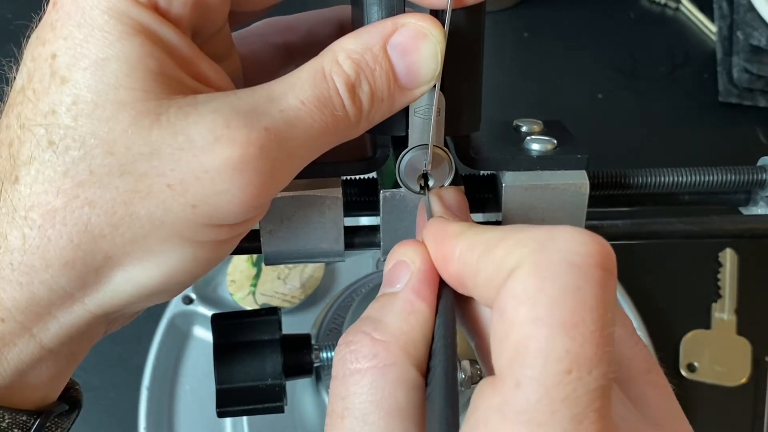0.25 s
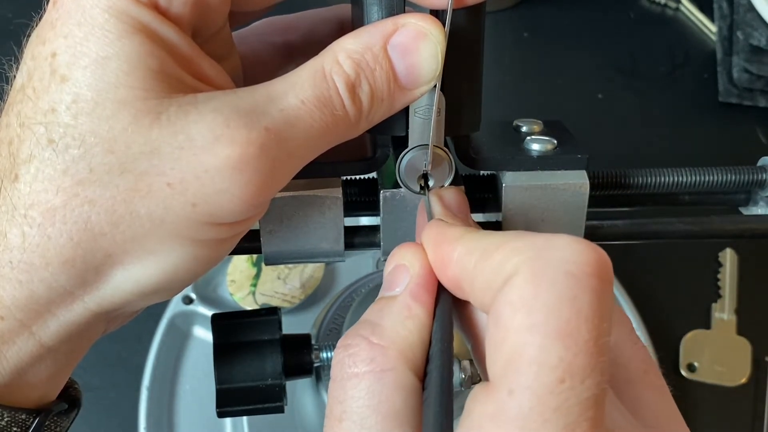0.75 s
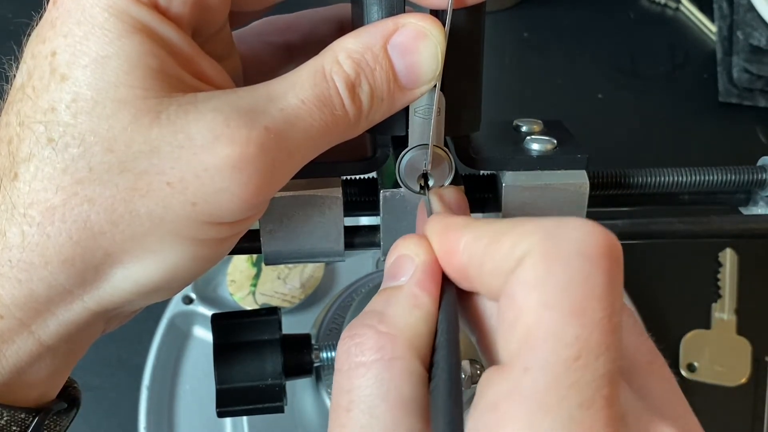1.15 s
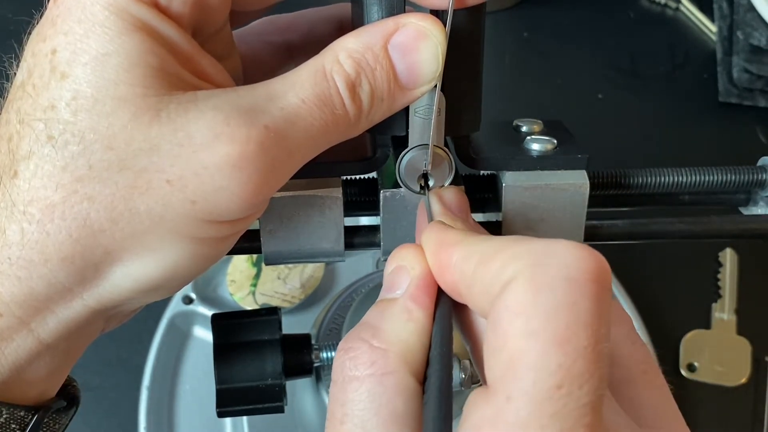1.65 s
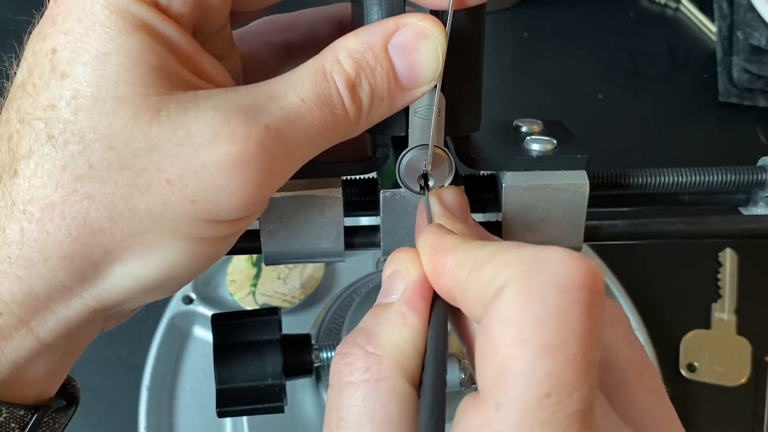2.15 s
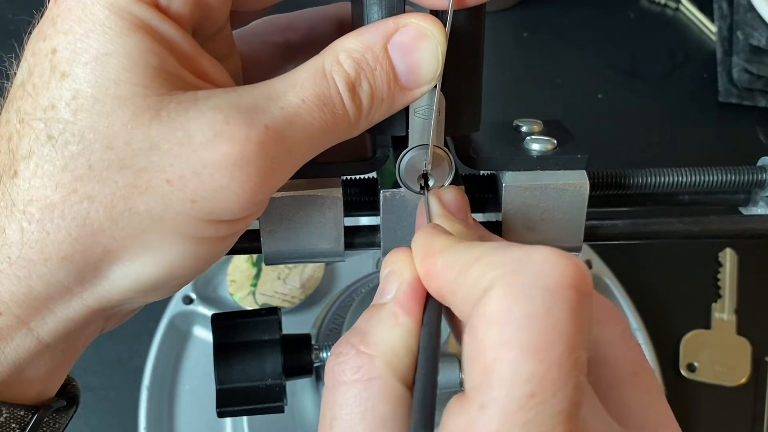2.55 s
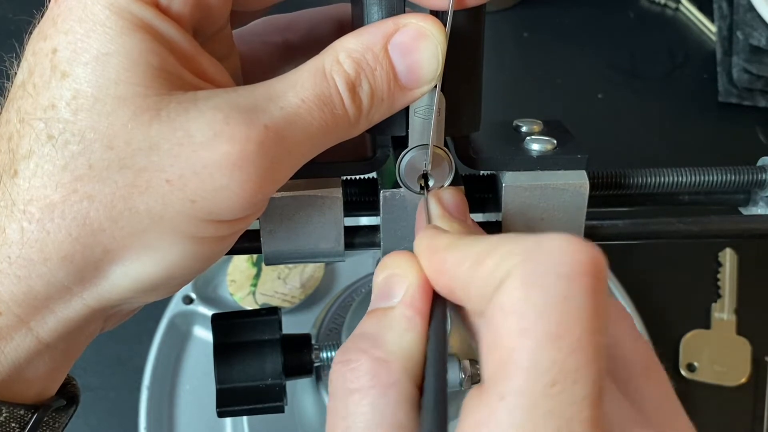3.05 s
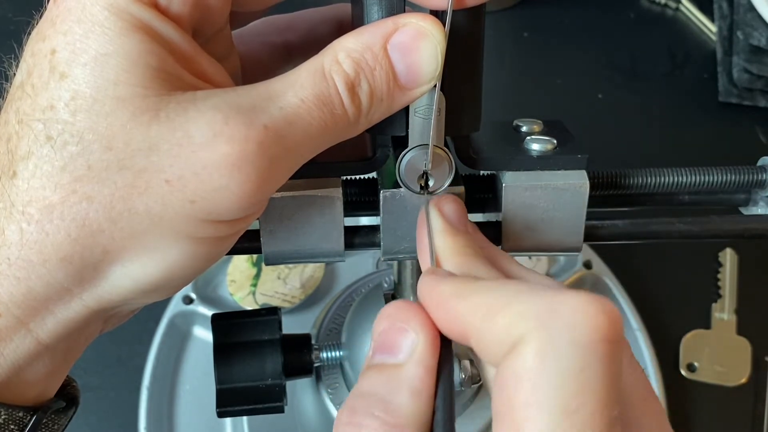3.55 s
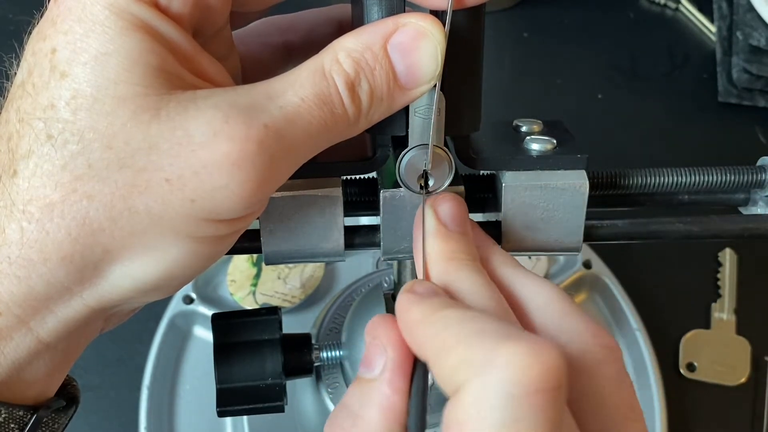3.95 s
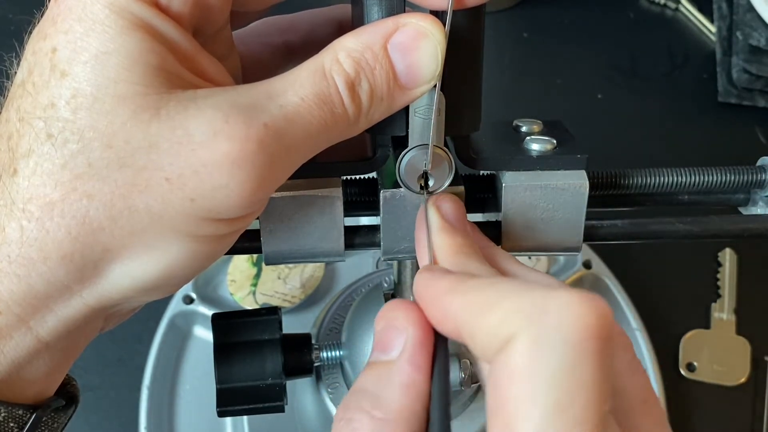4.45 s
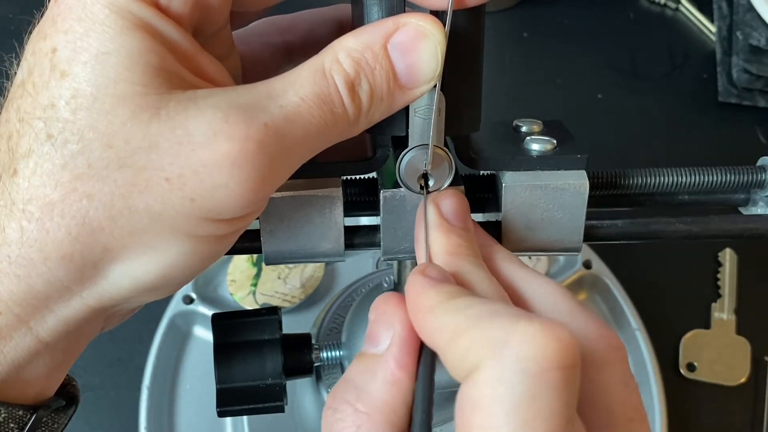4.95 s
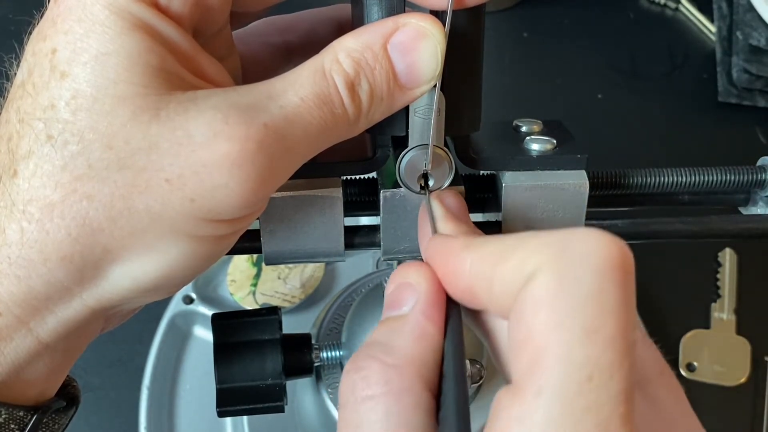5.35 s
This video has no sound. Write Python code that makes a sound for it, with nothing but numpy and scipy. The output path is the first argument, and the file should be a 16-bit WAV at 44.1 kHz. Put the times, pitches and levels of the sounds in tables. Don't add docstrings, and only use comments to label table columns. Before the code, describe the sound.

Close stereo pickup at a desk in a quiet room. A small motor nearby ticks very fast into a hollow casing, a purring rattle with an uneven knock about ten times a second. Over it a pick touches lock pins with faint clicks. Just before three seconds one pin snaps loudly in the metal vice, then small clicks and soft hand bumps continue.

```python
import sys
import numpy as np
from scipy import signal
from scipy.fft import rfft, irfft, next_fast_len
from scipy.io import wavfile

SR = 44100
rng = np.random.default_rng(int(sys.argv[2]) if len(sys.argv) > 2 else 0)


def transcribe(u):
    v = np.clip(np.atleast_2d(u).T, -1, 1)
    q = np.round(v * 32767).astype(np.int16)
    wavfile.write(sys.argv[1], SR, q)


def voltage_ratio(level):
    return 10 ** (np.asarray(level, float) / 20)


N = 246519


def coloured(x, spectrum):
    size = next_fast_len(x.shape[-1])
    hz, db = np.transpose(spectrum)
    bin_hz = np.arange(size // 2 + 1) * SR / size
    gain = voltage_ratio(np.interp(np.log(bin_hz + 1), np.log(hz), db))
    return irfft(rfft(x, size) * gain, size)[..., :x.shape[-1]]


def rms_one(x):
    return x / np.sqrt(np.mean(x ** 2))


def band(x, low_hz, high_hz):
    return signal.sosfilt(signal.butter(2, [low_hz, high_hz], "band", fs=SR, output="sos"), x)


def low_pass(x, cutoff_hz):
    return signal.lfilter(*signal.butter(2, cutoff_hz, fs=SR), x)


def impulses(t_s, db):
    out = np.full(N, 1e-18)
    index = np.clip((np.asarray(t_s) * SR).astype(int), 0, N - 1)
    np.add.at(out, index, voltage_ratio(db))
    return out


def struck(t_s, db, modes, spread_db):
    out = np.zeros(N)
    luck = rng.standard_normal((len(t_s), len(modes)))
    for k, (hz, level_db, t60_s) in enumerate(modes):
        radius = voltage_ratio(-60 / (t60_s * SR))
        angle = 2 * np.pi * hz / SR
        clicks = impulses(t_s, db + level_db + spread_db * luck[:, k])
        poles = [1, -2 * radius * np.cos(angle), radius ** 2]
        out += (-1) ** k * signal.lfilter([0, np.sin(angle)], poles, clicks)
    return out


def bursts(t_s, db, spectrum, t60_s):
    envelope = signal.lfilter([1], [1, -voltage_ratio(-60 / (t60_s * SR))], impulses(t_s, db))
    return envelope * rms_one(coloured(rng.standard_normal(N), spectrum))


def swell(middle_s, length_s):
    phase = np.clip((np.arange(N) / SR - middle_s) / length_s, -.5, .5)
    return np.cos(np.pi * phase) ** 2


# [f/Hz, level/dB per Hz]
AIR = [(25, -19), (60, -3.5), (150, -1.5), (200, -8.5), (450, -11.5), (900, -8.5), (1400, -7),
       (2000, -20.5), (2900, -20.5), (3800, -33), (7000, -34), (9000, -26.5), (14000, -31.5), (16000, -40)]
# [f/Hz, level/dB]
AIR_DIPS = [(500, 0), (630, -3), (800, 0), (1550, 0), (1720, -4), (1900, 0), (2200, 0), (2380, -3),
            (2600, 0)]
# [f/Hz, level/dB per Hz]
AIR_APART = [(25, -37), (100, -18.5), (400, -15), (1000, -7.5), (1400, -9), (1700, -22.5), (2900, -30.5),
             (3500, -46), (16000, -50)]
# [middle t/s, length/s, level/dB]
SWELLS = [
    (.5, .9, -68),
    (1.5, 1.3, -70),
    (3.0, 1.0, -70),
    (3.97, .5, -62),
    (5.3, 1.2, -73),
]
# [f/Hz, level/dB per Hz]
RUB = [(1500, -12), (2800, -6), (3600, 0), (5500, -1), (7000, -12)]


def room_tone():
    white = rng.standard_normal((4, N))
    rumble_level = voltage_ratio(-77) + sum(voltage_ratio(db) * swell(t_s, length_s) for t_s, length_s, db in SWELLS)
    rumble = rumble_level * voltage_ratio(-6) * rms_one(band(coloured(white[2], AIR), 70, 550))
    rub = voltage_ratio(-83) * swell(3.97, .55) ** .4 * rms_one(coloured(white[3], RUB))
    air = voltage_ratio(-67.5) * rms_one(coloured(coloured(white[0], AIR), AIR_DIPS))
    apart = voltage_ratio(-73.5) * rms_one(coloured(white[1], AIR_APART))
    return air + rumble + rub + apart * [[1], [-1]]


def drive_clock():
    first_s, tick_s, gain_s_per_tick2 = -.0018, .0188424, 7.46e-8
    wobble_s, wobble_ticks, wobble_start_rad = .00534, 96.97, 2.323
    tick = np.arange(int(N / SR / tick_s) + 1)
    wobble = wobble_s * np.sin(2 * np.pi * tick / wobble_ticks + wobble_start_rad)
    return tick, first_s + tick_s * tick - gain_s_per_tick2 * tick ** 2 + wobble


# [crest level/dB, late/s]
TEETH = [
    (-48, 0),
    (-58, -.0004),
    (-61, .0003),
    (-61.5, .0003),
    (-59, .0014),
]
# [t/s, crest level/dB]
GLANCING = [(.223, -54.5), (.317, -49.5), (.502, -49.5), (.593, -54.5), (.878, -57), (.974, -51),
            (1.070, -56.5), (1.262, -51), (1.358, -53.5), (1.546, -54), (1.829, -52.5), (2.014, -51),
            (2.478, -55), (2.573, -50), (2.953, -53.5), (3.146, -55.5), (3.241, -50.5), (3.335, -51.5),
            (3.876, -51), (3.969, -54), (4.247, -50.5), (4.530, -51), (4.817, -53.5), (5.104, -51.5),
            (5.478, -53.5), (5.571, -51)]
# [t/s, crest level/dB]
CATCHES = [(.093, -54.5), (.300, -51.5), (.672, -54.5), (1.341, -52.5), (1.905, -51), (1.997, -52.5),
           (2.090, -51), (3.803, -46), (3.894, -54), (3.951, -53), (3.990, -52.5), (4.062, -45.5),
           (4.230, -51.5), (4.455, -52.5), (4.608, -53), (4.741, -54), (4.895, -51), (5.028, -53),
           (5.145, -54), (5.181, -52), (5.404, -53.5), (5.440, -56)]
# [f/Hz, level/dB, t60/s]
CASING = [(740, -17.5, 0.12), (902, -8, 0.1), (1116.7, -0.5, .07), (1201.2, -1.5, 0.087),
          (1303.8, -1.5, .09), (1398.4, -5, 0.074), (1530, -18, 0.067)]
# [f/Hz, level/dB, t60/s]
CASING_HIGH = [(1928, -25, 0.3), (2133, -24.5, 0.18), (2640, -31, 0.15), (2830, -27.5, 0.12)]
# [f/Hz, level/dB, t60/s]
CASING_APART = [(898, -9, .07), (1230, -7, 0.0691), (1330, 0, .09)]
# [f/Hz, level/dB per Hz]
RATTLE = [(2000, -13.5), (3500, -13.5), (6500, -14.5), (8500, -2), (9500, 0), (12000, -8), (13500, -1),
          (15500, -8)]


def motor():
    heavy_tick, slip_tick = 2, 204
    tick, crest_s = drive_clock()
    tooth = (tick - heavy_tick + (tick >= slip_tick)) % len(TEETH)
    heavy = tooth == 0
    tooth_db, late_s = np.transpose(TEETH)[:, tooth]
    luck = rng.standard_normal((len(tick), 3))
    crest_s += late_s + np.where(heavy, .0002, .0008) * luck[:, 0]
    db = tooth_db + np.where(heavy, .7, 2.2) * luck[:, 1]
    for t_s, odd_db in [*GLANCING, *CATCHES]:
        db[np.argmin(abs(crest_s - t_s))] = odd_db
    start_s = crest_s - .0047
    ring = struck(start_s, db - 6.5, CASING, 1.1)
    ring += struck(start_s, .31 * db - 41.5, CASING_HIGH, 2.5)
    edge_db = -71.5 + .35 * (db + 60) + 3 * np.minimum(luck[:, 2], 1.7)
    edge = bursts(start_s + .0006, edge_db, RATTLE, .03)
    side = struck(start_s + .0026, db - 16.5, CASING_APART, 2)
    return ring + edge, side


# [f/Hz, level/dB, t60/s]
TRAY = [(272, -7.5, .08), (540, 0, .05), (318, -10, 0.09), (720, -14, 0.054), (473, 2, .065),
        (410, -9, .06)]
# [f/Hz, level/dB, t60/s]
DESK = [(148, 0, .13), (103, -4, .12), (52, -16, .3)]


def thumps(t_s, tray_db, desk_db, spread_db):
    low = struck(t_s, tray_db, TRAY, spread_db) + struck(t_s + .005, desk_db, DESK, spread_db)
    return band(low, 45, 1000)


# [f/Hz, level/dB per Hz]
CRACK = [(3000, -18.5), (5000, -13), (7000, -3), (9000, 0), (11000, 0), (13000, 1), (15000, -4),
         (16000, -5), (17000, -22)]
# [f/Hz, level/dB per Hz]
SCRATCH = [(600, -8), (1200, 3), (2000, 6), (3500, 6.5), (5000, -2), (6500, -2.5), (9000, -11)]


def contact_noise(t_s, scratch_db, crack_db):
    return bursts(t_s, crack_db, CRACK, .014) + bursts(t_s, scratch_db, SCRATCH, .05)


# [t/s, vice ring level/dB, scratch level/dB, crack level/dB]
PINS = [(0.2605, -67.5, -83, -71), (0.4974, -74, -88, -67), (0.9513, -64, -83, -71),
        (1.1555, -53, -92, -70), (1.3002, -67, -81, -66), (1.8664, -68, -85, -67),
        (2.4213, -39, -41, -46.5), (2.9823, -62, -75, -57.5), (3.0458, -64.5, -84, -68),
        (3.1384, -65, -78.5, -58), (3.1434, -70, -86, -64), (3.1616, -59, -75, -61),
        (3.1795, -58.5, -79, -65), (3.5334, -60, -81, -64), (4.1892, -61.5, -66, -64),
        (4.5046, -62, -61.5, -58), (4.5235, -50, -58, -49), (4.5365, -55, -70, -66),
        (4.5465, -52, -70, -62), (4.6113, -60.5, -85, -77), (4.826, -64, -81, -64), (4.8472, -67, -72, -66),
        (4.8567, -65, -74, -61), (4.8773, -48, -77, -72), (5.137, -60, -74, -66), (5.1407, -62, -71, -64),
        (5.269, -64, -74, -62), (5.388, -43, -76, -49.5), (5.398, -49, -74, -53)]
# [f/Hz, level/dB, t60/s]
PICK = [(1795, -4, .075), (1918, 0, .09), (2160, -11, .05), (2258, -12, .05), (2480, -12, .04),
        (3003, -12, .06), (3220, -14, .05), (585, -9, .05)]
# [f/Hz, level/dB, t60/s]
BLADE = [(3490, 0, .07), (4742, -2, .1), (5400, -11, .08), (6000, -10, .06)]
# [f/Hz, level/dB per Hz]
GRAIN = [(1350, -25), (1750, 0), (2500, -2), (3300, -8), (4000, -28)]


def pick_contacts():
    t_s, ring_db, scratch_db, crack_db = np.transpose(PINS)
    vice = low_pass(struck(t_s, ring_db - 4.5, PICK, 2.2), 2600)
    blade = struck(t_s, scratch_db - 11, BLADE, 1.5)
    grain = bursts(t_s + .001, ring_db - 9, GRAIN, .08)
    push_db = .4 * (ring_db + 60)
    base = thumps(t_s, -77 + push_db, -78 + push_db, 2.2)
    return vice + blade + grain + base, contact_noise(t_s, scratch_db - 4.5, crack_db + 2.5)


# [t/s, tray knock level/dB, desk
# thud level/dB]
BUMPS = [(0.498, -61, -72), (0.69, -64, -64), (1.159, -68, -70), (1.638, -60, -65), (2.058, -53.5, -68),
         (2.423, -62, -72), (2.983, -68, -76), (3.18, -68, -76), (4.506, -75, -62), (2.799, -50, -56),
         (4.527, -53, -52), (4.538, -55, -54), (4.554, -60, -57), (5.396, -58, -51), (5.409, -62, -58),
         (5.429, -68, -67)]


def soft_knocks():
    t_s, tray_db, desk_db = np.transpose(BUMPS)
    return low_pass(thumps(t_s, tray_db + 2.5, desk_db - 1.5, 2.5), 350)


# [t/s, vice ring level/dB, tray knock level/dB, desk thud level/dB]
SNAP = (2.7236, -15, -21.5, -28.5)
# [t/s, scratch level/dB, crack level/dB]
SNAP_CRACKS = [
    (2.707, -62, -75),
    (2.7228, -35, -15),
    (2.7245, -34, -19),
    (2.7288, -38, -30),
    (2.733, -42, -38),
]
# [f/Hz, level/dB, t60/s]
VICE = [(1210, -9, .035), (1050, -17, 0.034), (1622, -12, .055), (1790, -11, .055), (1890, 1.5, .06),
        (2129, -17, 0.021), (2360, -15, .04), (2460, -14, .04), (2600, -20, .04), (2866, -12, .045),
        (3050, -12, .045), (3310, -13, .045), (3613, -15, .04), (3902, -19, .04), (4430, -26, .06),
        (4750, -24, .04), (7300, -22, .04)]


def snap():
    t_s, ring_db, tray_db, desk_db = SNAP
    ring = struck([t_s], ring_db, VICE, 0)
    base = thumps(np.array([t_s + .001]), tray_db, desk_db, 0)
    return ring + base, contact_noise(*np.transpose(SNAP_CRACKS))


# [f/Hz, level/dB]
ROOM_TONE = [(100, -8), (1000, -2.5), (2000, -3), (5000, 1.5), (10000, -5.5), (16000, -8)]


def room(x):
    t60_s, level_db = .25, -11
    t = np.arange(SR // 2) / SR
    decay = voltage_ratio(-60 * t / t60_s) * (t > .004)
    shared, apart = rng.standard_normal((2, len(t))) * decay
    tails = np.array([shared + .2 * apart, shared - .11 * apart]) / np.sqrt(np.sum(shared ** 2))
    return voltage_ratio(level_db) * signal.fftconvolve(coloured(x, ROOM_TONE)[None], tails, axes=1)[:, :N]


def scene():
    air = room_tone()
    drive, drive_side = motor()
    pick_ring, pick_noise = pick_contacts()
    snap_ring, snap_noise = snap()
    ring = pick_ring + soft_knocks() + snap_ring
    noise = pick_noise + snap_noise
    echo = np.roll(ring, 90) - np.roll(ring, 70)
    side = drive_side + voltage_ratio(-19) * echo
    lock_pan = voltage_ratio(np.array([[.3], [-.3]]))
    drive_pan = voltage_ratio(np.array([[-.6], [.6]]))
    front = (ring + noise) * lock_pan + drive * drive_pan + side * [[1], [-1]]
    return front + room(.7 * ring + 1.3 * noise + .7 * drive) + air


def roll_off(x):
    return signal.sosfilt(signal.butter(12, 16990, fs=SR, output="sos"), x)


# [f/Hz, lead/rad]
PORT_LEAD = [(20, 0), (2000, .15), (2700, .55), (3500, .2), (4500, .5), (5300, .3), (6200, 1.9),
             (7300, np.pi), (10450, 2 * np.pi), (13550, 3 * np.pi), (16300, 4 * np.pi)]


def record(dry):
    size = next_fast_len(N + 4096)
    bin_hz = np.arange(size // 2 + 1) * SR / size
    lead_rad = np.interp(bin_hz, *np.transpose(PORT_LEAD))
    shift = np.exp(.5j * lead_rad * [[1], [-1]])
    ports = irfft(rfft(dry, size) * shift, size)[:, :N]
    top = signal.cheby2(10, 60, 17000, fs=SR, output="sos")
    return roll_off(signal.sosfilt(top, ports))


dry = scene()
out = record(dry)
transcribe(out)
```